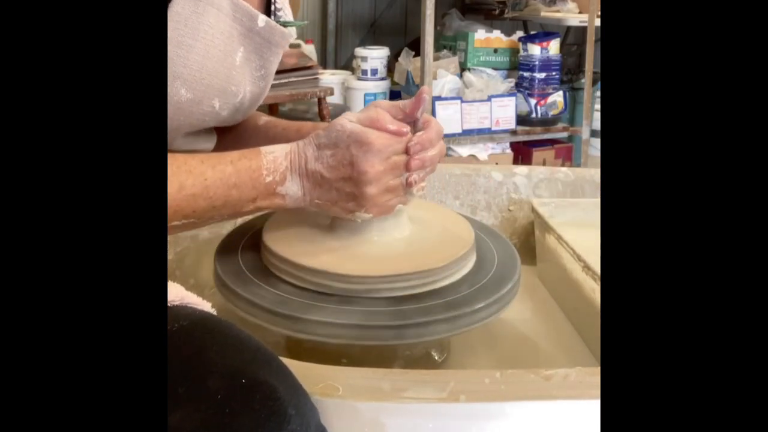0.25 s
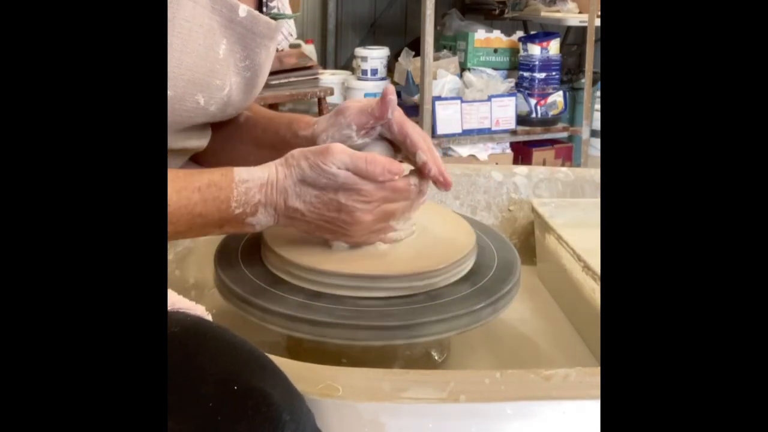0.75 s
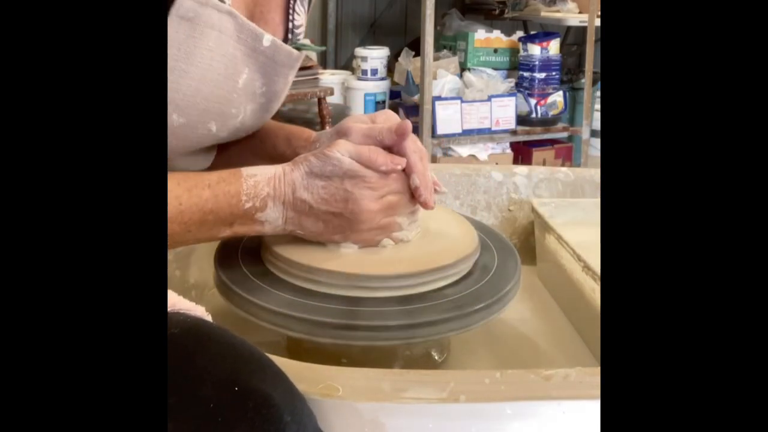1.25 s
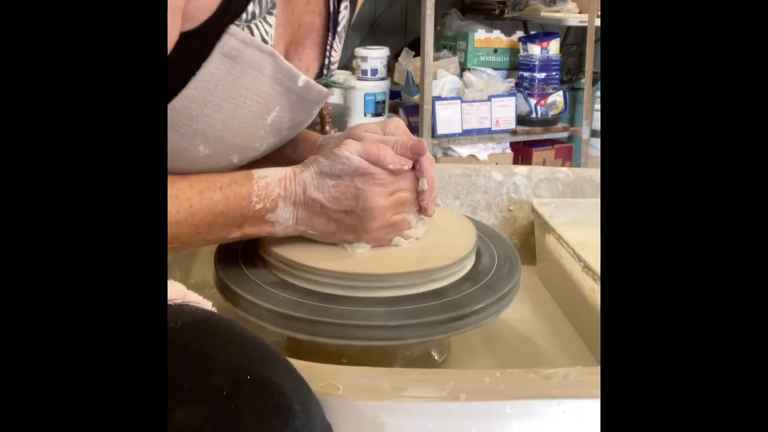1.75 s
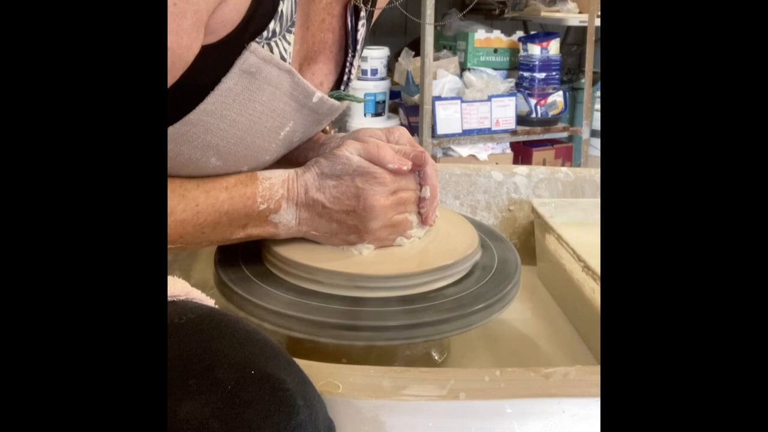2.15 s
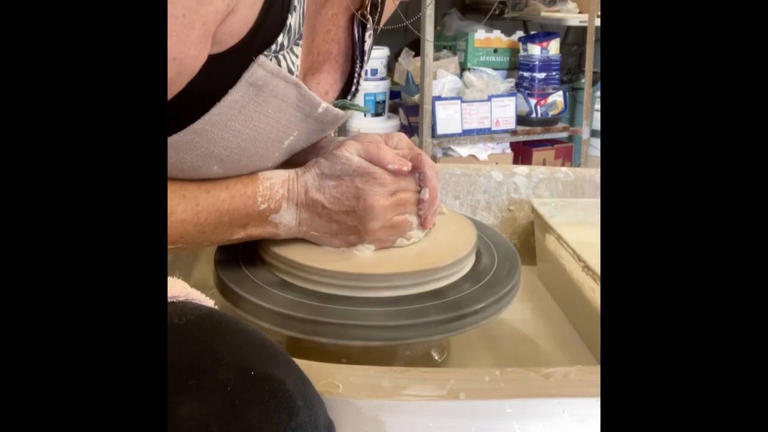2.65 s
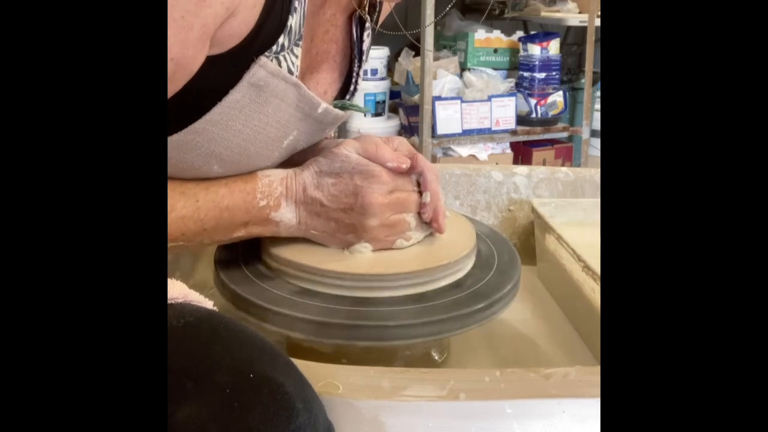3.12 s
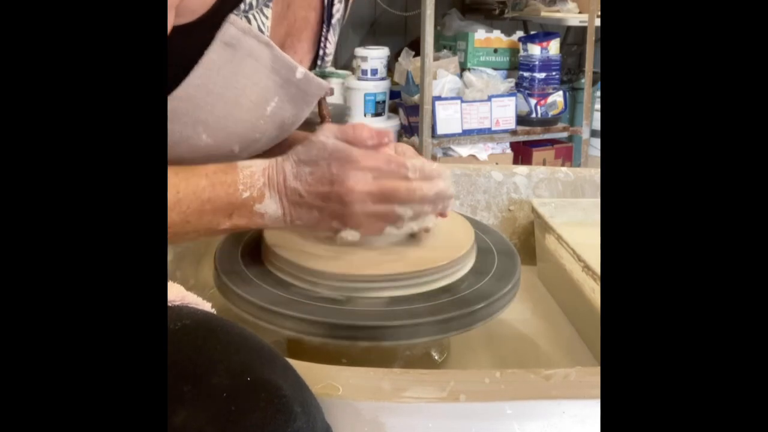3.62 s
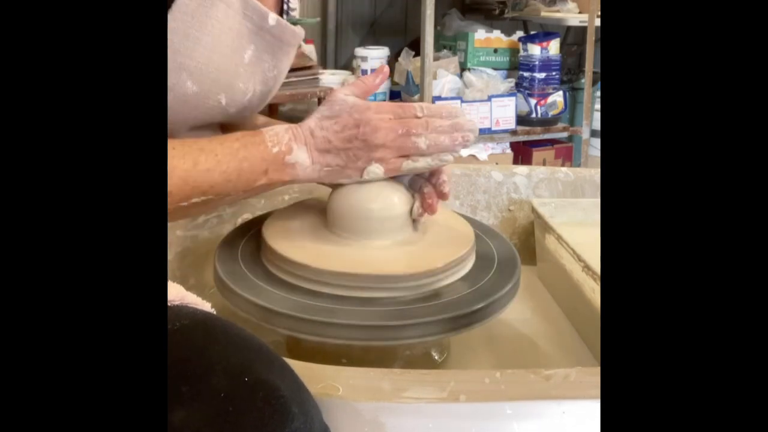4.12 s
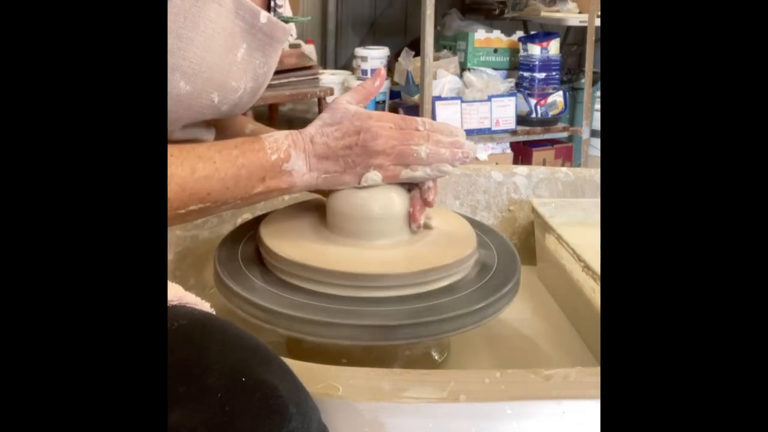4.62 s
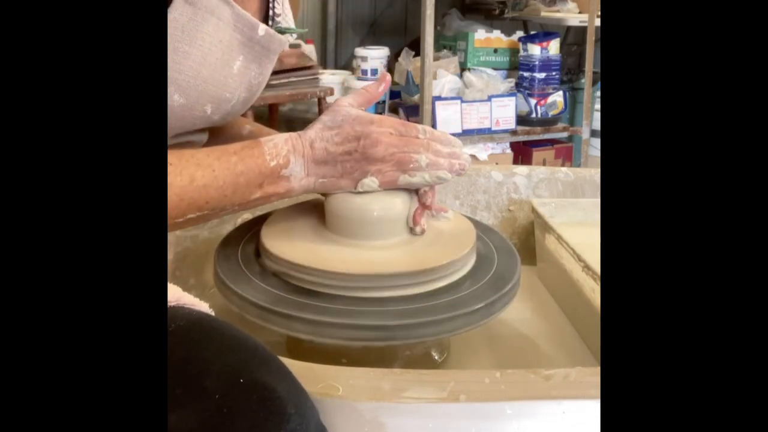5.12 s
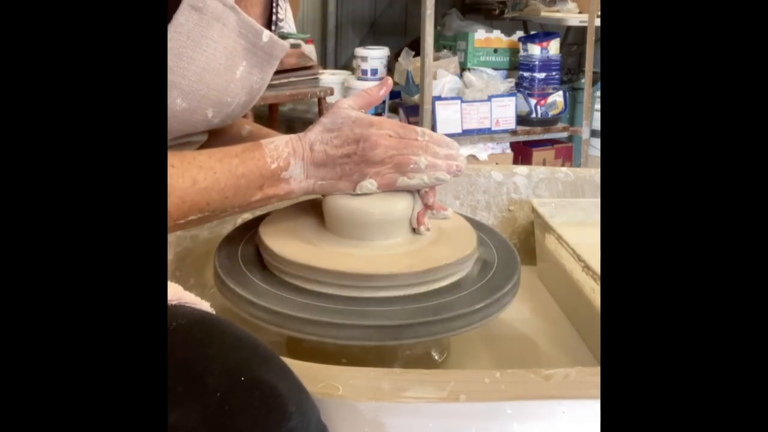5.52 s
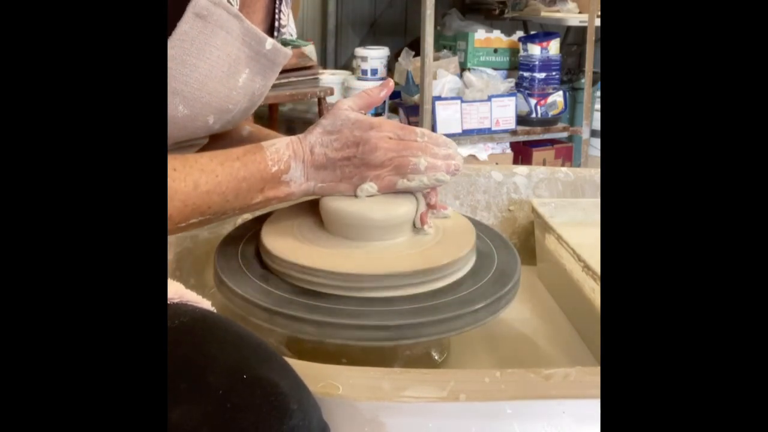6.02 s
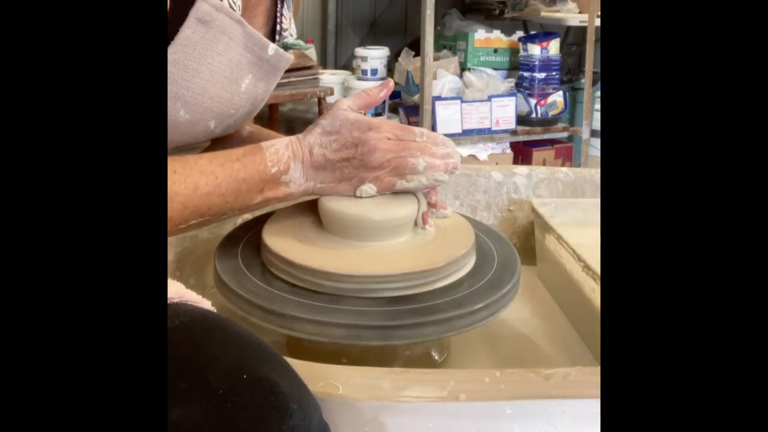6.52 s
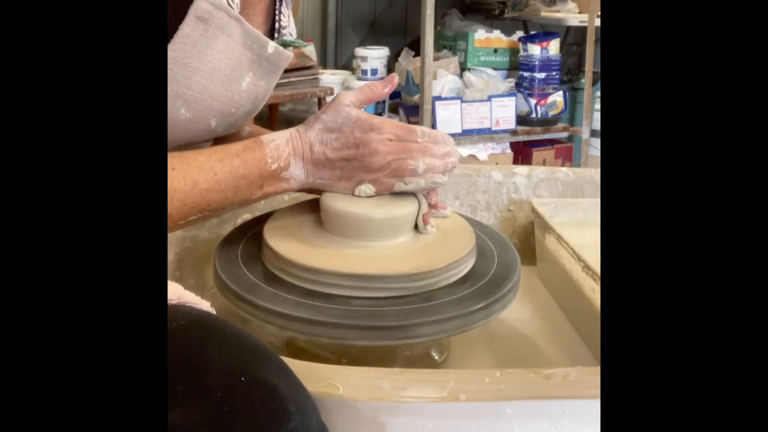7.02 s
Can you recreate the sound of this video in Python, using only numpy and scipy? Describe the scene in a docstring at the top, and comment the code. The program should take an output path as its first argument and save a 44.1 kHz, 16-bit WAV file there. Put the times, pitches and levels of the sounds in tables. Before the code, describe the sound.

Close in a small pottery studio, an electric wheel hums constantly, deep and slightly throbbing, with belt rumble and a thin whine. Wet hands touch the clay quietly, then a hard knock rattles the splash pan at about two seconds. Gritty palm hiss grows as the hands press, with brief low groans, then eases into soft rubbing, tiny wet ticks and very faint high squeaks. The hum runs on to the end.

```python
"""A motor hums at twice the mains rate and throbs with each turn of an electric pottery wheel.
Belt and shaft add a rumble and a faint whine as lines tied to one drive speed, over filtered rolling noise.
Two wet hands centre a lump of clay: palms and fingers hiss as shaped noise, slip ticks in decaying puffs,
wet skin squeaks in gliding sines, and one knock with a short rattle rings the modes of the splash pan."""
import sys
import numpy as np
from scipy import signal
from scipy.fft import rfft, irfft
from scipy.io import wavfile
from scipy.ndimage import uniform_filter1d

SR = 44100
rng = np.random.default_rng(int(sys.argv[2]) if len(sys.argv) > 2 else 0)


def inscribe(sig):
    """Save sig as 16-bit PCM at rate SR to the path in sys.argv[1].

    A 1-D sig is mono; a 2-D sig holds one channel per row.
    Samples are clipped to [-1, 1] before scaling.
    """
    pcm = np.round(np.clip(np.atleast_2d(sig).T, -1, 1) * 32767)
    wavfile.write(sys.argv[1], SR, pcm.astype(np.int16))


N = 320166
T = np.arange(N) / SR
HZ = np.fft.rfftfreq(N, 1 / SR)
MAINS_HZ = 50.0
OCTAVE_HZ = 4 * MAINS_HZ  # octave of the hum
SWELL_S = 1.742  # lines near the octave come into step here
EDGE_HZ = 15700


def gain_of(db):
    """Decibels to amplitude."""
    return np.exp(np.asarray(db) * (np.log(10) / 20))


def evened(x):
    """Scales to rms 1."""
    return x / np.sqrt(np.mean(abs(x) ** 2) + 1e-30)


def read(points, hz):
    """Joins spectrum points by straight lines over log frequency."""
    f, value = np.transpose(points)
    return np.interp(np.log(hz + 1), np.log(f + 1), value)


def curve(points):
    """A control curve at every sample."""
    return np.interp(T, *np.transpose(points))


def add(mix, s, sound):
    """Mixes a stereo sound in at time s."""
    part = mix[:, max(round(s * SR), 0):][:, :sound.shape[1]]
    part += sound[:, :part.shape[1]]


def drift(rate_hz, size=2048):
    """Slow chance of rms 1; its spectrum falls as a Gaussian of this width."""
    f = np.fft.rfftfreq(size, T[-1] / size)
    slow = irfft(rfft(rng.standard_normal(size)) * np.exp(-.5 * (f / rate_hz) ** 2) * (f > 0))
    return np.interp(T, np.linspace(0, T[-1], size), evened(slow))


def beat(turns, times, place):
    """A swing of +-1 that peaks so many times a turn, with one of its peaks at the given place in the turn."""
    return np.cos(2 * np.pi * times * (turns - place))


# Likeness of the two ports. Each row: frequency in Hz, correlation (clipped to +-1).
PORT_LIKENESS = [(60, 1.5), (290, 1.5), (480, 0.63), (700, 0.02), (1100, -0.27), (1400, 0), (2200, -0.31),
                 (3500, -0.24), (5000, -0.02), (6000, .5), (6600, 1.5), (15000, 1.02)]
# Balance of the two ports, for noise and tones. Each row: frequency in Hz, left minus right in dB.
PORT_BALANCE_DB = [(60, -4.5), (110, -5), (200, -6), (380, -2), (700, -3), (1290, -0.5), (2380, 0),
                   (15000, 0)]


def noise(colour_db, count=N):
    """Stereo noise, partly correlated at the two ports; colour_db gives dB per Hz against frequency."""
    hz = np.fft.rfftfreq(count, 1 / SR)
    a, b = rfft(rng.standard_normal((2, count)))
    same = np.clip(read(PORT_LIKENESS, hz), -1, 1)
    lean = gain_of(read(PORT_BALANCE_DB, hz) / 2)
    pair = np.array([a * lean, (same * a + np.sqrt(1 - same ** 2) * b) / lean])
    return irfft(pair * gain_of(colour_db(hz)), count) * np.sqrt(SR / 2)


def puff(hz, octaves, count):
    """Noise of rms 1 in one soft band."""
    def band_db(f):
        return -10 / np.log(10) * (np.log2((f + 1) / hz) / octaves) ** 2
    return evened(noise(band_db, count))


def tone(turns, hz, db, lead_rad, in_step=False):
    """One line at both ports; its starting phase is random unless it is in step with others."""
    start = rng.random() * (not in_step)
    lean = gain_of(read(PORT_BALANCE_DB, hz) / 2)
    angle = (2 * np.pi * ((turns + start) % 1)).astype(np.float32)
    return np.sqrt(2) * gain_of(db) * np.array([lean * np.cos(angle + lead_rad), np.cos(angle) / lean])


def shelves(x, share, spread_s=.02, count=24):
    """Early reflections from walls and shelves cut fine peaks and notches into a sound above the bass."""
    delay_s = .002 + spread_s * rng.random(count)
    sign = rng.choice([-1., 1.], count)
    taps = np.zeros(N)
    taps[(delay_s * SR).astype(int)] = sign / np.sqrt(count)
    wet = share * HZ / (HZ + 700)
    return irfft(rfft(x) * (1 + wet * rfft(taps)) / np.sqrt(1 + wet ** 2), N)


def flicker(x, patchy_db, size=1024):
    """Above the bass, the level flickers in patches a few hundred Hz wide and tens of ms long."""
    hz, _, z = signal.stft(x, SR, nperseg=size)
    patches = uniform_filter1d(rng.standard_normal(z.shape[1:]), size=6, axis=0)
    patches = evened(uniform_filter1d(patches, size=4, axis=1))
    depth_db = patchy_db * hz / (hz + 800)
    return signal.istft(z * gain_of(depth_db[:, None] * patches), nperseg=size)[1][:, :N]


# Palms: light wetting, a hard push to centre the clay, then smoothing its top.
# Each row: time in seconds, hiss in dB before the lump and softening act on it.
PALM_PRESSURE = [(0, -91), (.35, -65), (.6, -84), (1.2, -83), (1.5, -97), (1.98, -73), (2.15, -64.5),
                 (2.28, -61.5), (2.4, -63), (2.7, -58.5), (3.15, -58.5), (3.42, -62), (3.62, -70),
                 (4.2, -72), (4.6, -72.5), (5.15, -80), (5.55, -75), (5.88, -66), (6.45, -76), (7.1, -72)]
FIRM_DB = -66.5


def firmness():
    """How hard the hands bear down, from 0 to 2/3, a soft step in the palms' level."""
    return 1 / (1.5 + np.exp((FIRM_DB - curve(PALM_PRESSURE)) / 2))


# The potter leans over the wheel and shades the whine, then sits back.
# Each row: time in seconds, whine in dB.
LEAN_DB = [(0, 0.5), (1.5, -2.2), (3.1, -2.6), (4, 2.2), (5.5, 1.5), (6.2, 3.5), (7.3, 2)]
# The belt tugs at the shaft. Each row: times a lap, swing in dB, place of one peak in the lap 0-1.
BELT_TUG = [(1, 1.7, 0.53), (2, 2.0, 0.43)]


def whine_level(laps):
    """The main whine (dB) follows the potter's lean and throbs as the belt tugs at the shaft."""
    return curve(LEAN_DB) + sum(db * beat(laps, times, place) for times, db, place in BELT_TUG)


def shade(hz, centre_hz=1330, octaves=0.19):
    """How far a frequency belongs to the main whine, which the potter can shade, 0-1."""
    return np.exp(-(np.log2((hz + 1) / centre_hz) / octaves) ** 2)


def shaded(x, whine_db, share=0.84):
    """The whine's band within a broad sound follows a share of the whine's level."""
    return x + irfft(rfft(x) * shade(HZ), N) * (gain_of(share * whine_db) - 1)


# Rolling noise of the drive, before resonances and treble cut. Each row: frequency in Hz, dB per Hz.
WHIRR_SPECTRUM = [(20, -94.5), (33, -85), (45, -69.5), (60, -68.5), (75, -74), (105, -67), (200, -67),
                  (280, -71), (355, -79), (410, -70), (470, -71), (530, -78), (600, -79.5), (950, -88.5),
                  (1400, -90.5), (2400, -95), (2900, -101), (3300, -108)]
# Air of the room, before resonances. Each row: frequency in Hz, dB per Hz.
AIR_SPECTRUM = [(1000, -110), (3200, -101), (4200, -103), (4800, -99), (5500, -103), (7500, -106.5),
                (9500, -106), (11000, -112), (13000, -119), (15500, -125)]
# Housing resonances. Each row: centre in Hz, width in Hz, lift in dB.
HOUSING_MODES = [(688, 16, 4), (789.5, 49, 9.5), (875, 20, 5), (1020, 14, 5), (1120, 52, 7.5),
                 (1348, 22, 4), (1392, 55, 6), (1540, 22, 4), (1650, 22, 3), (1690, 36, 6), (1868, 24, 5),
                 (2015, 24, 5.5), (2190, 25, 5), (2347, 16, 7), (2540, 32, 8), (2655, 30, 9), (2755, 35, 9),
                 (2915, 45, 9), (3620, 46, 1), (3870, 75, 4), (4940, 53, 2), (6400, 120, 2.5),
                 (8350, 190, 8.5)]


def rolling(laps, shaft, half_lap_db=1.0, shaft_db=1.5, swell_db=1.0):
    """Rolling noise rings in the housing and pulses with belt and shaft, over air without that pulse."""
    def housing(f):
        return sum(db / (1 + (2 * (f - hz) / width) ** 2) for hz, width, db in HOUSING_MODES)

    def whirr_db(f):
        return read(WHIRR_SPECTRUM, f) + housing(f) - 20 * np.log10(1 + (f / 5000) ** 4)

    pulse_db = half_lap_db * np.cos(4 * np.pi * laps) + shaft_db * np.sin(2 * np.pi * shaft)
    whirr = noise(whirr_db) * gain_of(pulse_db + swell_db * drift(11.0))
    air = noise(lambda f: read(AIR_SPECTRUM, f) + housing(f))
    return flicker(shelves(whirr + air, share=0.38), patchy_db=2.9, size=1536)


# Motor shaft. Each row: multiple of its turning rate (rounded for pitch), dB before shading,
# left lead in radians.
SHAFT_LINES = [(5, -61, 8), (6, -47, 4.5), (7.04, -46.5, 0), (10, -52, 1.5), (13, -65, -2.5),
               (14, -62.5, 0), (16, -58.5, -0.9), (17, -56, 1), (20, -59, 0.9), (28, -71, 0.5),
               (30, -64.5, 1), (32, -64, -1.5), (40, -75.5, -1), (45, -66.5, -2), (46, -67.5, -2),
               (47.8, -66.5, 2.5), (51, -71.5, 1.5), (52, -55, 3.5), (53, -72.5, 2.5), (56.5, -73, -0.5)]
# Drone and whine of the bearings. Each row: Hz at mean speed, dB before level curves, left lead in radians.
BEARING_LINES = [(375, -55, 0), (1378, -75, 1), (1397, -70, 1), (1416, -71, 1), (1423, -74, 2),
                 (1446, -72.5, 1), (1626, -74, -1.5), (1667, -76, -1), (1677, -70, -.8), (1690, -76, -1),
                 (1708, -71, -1), (1727, -74, -1), (1779, -78, 2), (1821, -79, 1), (1860, -80, 1),
                 (1923, -74, 2), (1955, -71, 2.8), (2077, -76, 1.2), (2347, -84, 0), (2530, -81, 0),
                 (4790, -87, .5), (4968, -82, .5)]
# Bearings' upper whine. Each row: time in seconds, level change in dB.
UPPER_WHINE_DB = [(0, 2), (1.7, 1.5), (3.5, 0), (4.5, -0.5), (7.3, -1)]
UPPER_LO_HZ, UPPER_HI_HZ, WAVER_DB = 1600, 1900, 1.5
SHAFT_SLIP_TURNS, FLUTTER_HZ = 0.0014, 8.0


def motor(shaft, shaft_hz, whine_db, flutter=0.2, wander_cycles=0.072):
    """Multiples of the shaft's turning rate and the thin tones of its bearings."""
    out = np.zeros((2, N))
    upper_db = curve(UPPER_WHINE_DB) + WAVER_DB * drift(8.2)
    for order, db, lead_rad in SHAFT_LINES:
        turns = round(order) * (shaft + SHAFT_SLIP_TURNS * drift(3.9))
        hz = order * shaft_hz
        line = tone(turns, hz, db + shade(hz) * whine_db, lead_rad)
        out += line * (1 + flutter * drift(FLUTTER_HZ))
    for hz, db, lead_rad in BEARING_LINES:
        turns = hz * shaft / shaft_hz + wander_cycles * drift(3.4)
        swell_db = upper_db if UPPER_LO_HZ < hz < UPPER_HI_HZ else shade(hz) * whine_db
        out += tone(turns, hz, db + swell_db, lead_rad) * (1 + flutter * drift(FLUTTER_HZ))
    return out


# The belt shakes the frame. Each row: multiple of its lap rate, dB running free.
BELT_LINES = [(12, -48.5), (13, -48.5), (14, -51), (15, -60), (16, -55), (17, -47.5), (18, -50), (19, -44),
              (20, -49.5), (21, -55.5), (22, -50), (23, -52.5), (24, -47.5), (25, -46), (26, -48),
              (27, -46.5), (28, -43.5), (29, -52), (30, -55.5), (31, -57.5), (32, -53), (34, -54.5),
              (35, -52), (37, -63.5), (39, -57.5), (41, -59.5), (44, -55), (45, -61.5), (46, -57.5),
              (57, -53), (58, -55), (59, -54.5), (60, -60.5)]
BELT_SLIP_LAPS, BEAT_RANGE_HZ = 0.002, 16
PULSE_PLACE_LAPS, PULSE_SCATTER_CYCLES = 0.475, 0.12
TAUT_DB_PER_FIRMNESS, TAUT_ABOVE_ORDER = -5, 50


def belt(laps, lap_hz, flutter=0.13):
    """The uneven belt shakes each lap and pulses as its stiff spot meets each pulley.

    Slip blurs high multiples, load calms the highest, and those near the octave beat with it."""
    out = np.zeros((2, N))
    since_swell = laps - np.interp(SWELL_S, T, laps)
    taut = gain_of(TAUT_DB_PER_FIRMNESS * firmness())
    for order, db in BELT_LINES:
        hz, k = order * lap_hz, round(order)
        beats = abs(hz - OCTAVE_HZ) < BEAT_RANGE_HZ
        pulses = hz < OCTAVE_HZ - BEAT_RANGE_HZ
        turns = k * since_swell
        if pulses:  # a quarter cycle on odd multiples gives a second pulse half a lap later
            scatter = PULSE_SCATTER_CYCLES * rng.standard_normal()
            turns = k * (laps - PULSE_PLACE_LAPS) + k % 2 / 4 + scatter
        turns = turns + k * BELT_SLIP_LAPS * drift(1.73)
        line = tone(turns, hz, db, 0.15, in_step=beats or pulses) * (1 + flutter * drift(3.2))
        out += line * taut if order > TAUT_ABOVE_ORDER else line
    return out


# Groans under load. Each row: middle in seconds, peak level in dB.
GROAN_TIMES = [(2.39, -43), (2.81, -45), (3.22, -39.5)]
GROAN_HZ, GROAN_S = 229, 0.092


def groans():
    """The drive groans briefly under the full weight of the hands: one line in Gaussian swells."""
    swell = sum(gain_of(db) * np.exp(-(2 * (T - s) / GROAN_S) ** 2) for s, db in GROAN_TIMES)
    return tone(GROAN_HZ * T, GROAN_HZ, 0, 0) * swell


LAG_PLACE_TURNS = 0.09  # where the octave swells and the overtones lag
OCTAVE_DB, ROTOR_DB, ROTOR_LAG_HZ = -41, -42.5, 0.92


def octave(wheel, lead_rad=0.12, wander_cycles=0.058, throb_db=2.0):
    """The hum's octave and the slightly slower rotor beat together, and swell once a wheel turn."""
    lines = (OCTAVE_HZ, OCTAVE_DB), (OCTAVE_HZ - ROTOR_LAG_HZ, ROTOR_DB)
    out = np.zeros((2, N))
    for hz, db in lines:
        turns = hz * (T - SWELL_S) + wander_cycles * drift(1.4)
        out += tone(turns, hz, db, lead_rad, in_step=True)
    return out * evened(gain_of(throb_db * beat(wheel, 1, LAG_PLACE_TURNS)))


# Hum overtones. Each row: multiple of the mains, dB running free, depth of the throb,
# share of it that comes twice a turn, left lead in radians.
HUM_OVERTONES = [(6, -42.5, .12, .25, 0.37), (8, -59.5, 0.33, .4, 2), (10, -53.5, 0.44, .75, 0.86),
                 (16, -61, 0.44, 0.96, -.5), (26, -64.5, .15, .5, 2), (28, -74, .15, .5, 2.5),
                 (40, -77.5, 0.19, .5, 0)]
HUM_DB, LOAD_DB_PER_FIRMNESS = -25.5, 1.5
THROB_ONCE_PLACE_TURNS, THROB_TWICE_PLACE_TURNS = 0.76, 0.45
LAG_FREE_CYCLES, LAG_CYCLES_PER_FIRMNESS = 0.21, 0.12


def hum(wheel, sway_cycles=0.0077, lead_rad=0.26, unsteady=0.47,
        once_db_per_firmness=1.2, twice_db=0.55, overtone_db_per_firmness=2.1):
    """The motor's iron hums, louder under load; off-centre clay makes its overtones throb and lag."""
    angle, firm = 2 * np.pi * wheel, firmness()
    load_db = HUM_DB + firm * (LOAD_DB_PER_FIRMNESS - once_db_per_firmness * np.sin(angle))
    load_db = load_db + twice_db * np.cos(2 * angle - 1)
    out = tone(2 * MAINS_HZ * T + sway_cycles * np.sin(angle), 2 * MAINS_HZ, load_db, lead_rad)
    lag = LAG_FREE_CYCLES + LAG_CYCLES_PER_FIRMNESS * firm
    lag = lag * np.cos(np.pi * (wheel - LAG_PLACE_TURNS)) ** 6  # once a turn
    once = beat(wheel, 1, THROB_ONCE_PLACE_TURNS)
    twice = beat(wheel, 2, THROB_TWICE_PLACE_TURNS)
    for order, db, depth, double, port_lead_rad in HUM_OVERTONES:
        throb = (1 - double) * once + double * twice
        turns = round(order) * MAINS_HZ * T - lag + 0.1 * depth * drift(3.3)
        loaded_db = db + double * overtone_db_per_firmness * firm
        swell = evened(1 + depth * (throb + unsteady * drift(8.2)))
        out += tone(turns, order * MAINS_HZ, loaded_db, port_lead_rad) * swell
    return out


# A knock, then its rattle. Each row: start in seconds, starting dB, t60 in seconds, treble corner in Hz.
KNOCK_CONTACTS = [(2.0351, -31.5, 0.055, 14000), (2.0455, -33.5, 0.06, 3000), (2.0525, -34.5, 0.09, 3200),
                  (2.0625, -43, 0.12, 2200)]
# Colour of the contact. Each row: frequency in Hz, relative dB per Hz.
CRACK_COLOUR = [(150, 0), (270, 9), (450, 10.5), (750, 7), (950, -1.5), (1100, 2.5), (1400, 2), (1650, -6),
                (2000, -10), (2900, -7), (3900, -3), (5200, -12), (7200, -12.5), (9800, -9.5), (12000, -21),
                (16000, -25)]
# Splash pan modes. Each row: frequency in Hz, starting dB, t60 in seconds.
PAN_MODES = [(280, -36.5, 0.35), (378, -41, 0.25), (465, -35.5, 0.3), (479, -39, 0.35), (605, -35.5, 0.12),
             (660, -38, 0.1), (743, -40, 0.14), (800, -39.5, 0.16), (1115, -47, 0.15), (1300, -49, 0.09),
             (1410, -47, 0.12), (2778, -54, 0.14), (3967, -48, 0.12), (8750, -52, 0.11), (12250, -55, 0.11)]
RATTLE_DB = 1.5


def knock(room_db=-50, room_t60_s=0.72, count=22050):
    """A hard contact and duller, ragged rebounds ring the splash pan; the studio answers briefly."""
    out, t = np.zeros((2, N)), np.arange(count) / SR

    def crack(top_hz):
        return evened(noise(lambda f: read(CRACK_COLOUR, f) - 10 * np.log10(1 + (f / top_hz) ** 2), count))

    for s, db, t60_s, top_hz in KNOCK_CONTACTS:
        grit = evened(gain_of(RATTLE_DB * drift(250, size=16384)[:count]))
        add(out, s, gain_of(db - 60 * t / t60_s) * grit * crack(top_hz))
    ring = sum(tone(hz * t, hz, db - 60 * t / t60_s, 0) for hz, db, t60_s in PAN_MODES)
    room = gain_of(room_db - 60 * t / room_t60_s) * crack(EDGE_HZ)
    add(out, KNOCK_CONTACTS[0][0], (ring + room) * (1 - np.exp(-t / 0.0015)))  # soft onset
    return out


# Squeaks of wet skin, one list of rows each.
# Each row: time in seconds, pitch in Hz, dB before the trim SQUEAK_DB.
SQUEAK_GLIDES = [
    [(.76, 9200, -90), (.85, 9950, -69), (.92, 10600, -69), (.98, 11200, -62), (1.03, 12300, -76),
     (1.08, 13100, -76), (1.16, 12900, -87), (1.21, 12450, -67), (1.27, 11100, -66), (1.3, 10200, -88)],
    [(4.72, 9100, -85), (4.78, 9600, -73), (4.84, 11100, -76), (4.9, 12000, -74), (4.97, 12000, -73),
     (5.06, 11300, -75), (5.1, 10500, -90)],
    [(4.9, 7600, -85), (4.93, 8100, -66), (4.96, 8350, -68), (5, 8150, -85)],
    [(4.99, 9400, -85), (5.05, 8950, -64), (5.13, 8650, -71), (5.2, 9000, -65), (5.28, 8700, -75),
     (5.35, 7550, -73), (5.39, 7050, -74), (5.44, 6570, -88)],
]
CATCH_DB, SQUEAK_DB = 2.8, -3.0


def squeaks(waver=0.01):
    """Very high whistles swell, glide along smoothed curves and catch as the film of water thins."""
    out = np.zeros(N)
    for glide in SQUEAK_GLIDES:
        s, hz, db = np.transpose(glide)
        pitch_hz = uniform_filter1d(np.interp(T, s, hz), size=1500)
        pitch_hz = pitch_hz * (1 + waver * drift(400, size=8192))
        level = gain_of(np.interp(T, s, db)) * (T > s[0]) * (T < s[-1])
        out += level * np.sqrt(2) * np.sin(2 * np.pi * np.cumsum(pitch_hz) / SR)
    return out * gain_of(SQUEAK_DB) * evened(gain_of(CATCH_DB * drift(25)))


# Bubbles of slip. Each row: start in seconds, starting dB, centre in Hz, width in octaves, t60 in seconds.
SLIP_BUBBLES = [(.325, -54, 11700, .17, .035), (.83, -64, 11500, .25, .04), (1.09, -63, 11200, .12, .03),
                (2.364, -59, 9000, .6, .025), (3.221, -62, 8000, .6, .025), (3.571, -63, 12000, .2, .02),
                (3.774, -61, 10000, .25, .025), (3.985, -56, 9000, .4, .04), (4.14, -53, 6200, 0.4, .028),
                (4.435, -52, 5200, 0.26, 0.03), (4.5045, -44.5, 10800, 0.28, 0.009),
                (4.577, -57, 4000, .5, .02), (4.639, -51.5, 3700, 0.46, 0.018),
                (4.676, -57, 6000, .6, .025), (4.688, -60, 9000, .5, 0.036), (5.032, -56, 8000, .5, .025)]


def slip_ticks(count=4096):
    """Tiny bubbles burst between skin and clay: decaying puffs of banded noise."""
    out, t = np.zeros((2, N)), np.arange(count) / SR
    for s, db, hz, octaves, t60_s in SLIP_BUBBLES:
        add(out, s, gain_of(db - 60 * t / t60_s) * puff(hz, octaves, count))
    return out


# Off-centre lump.
# Each row: times a turn, swing in dB before scaling by pressure, place of one peak in the turn 0-1.
LUMP_SWELL = [(1, 4, 0.87), (2, 3.5, 0.53)]
# Colour of the palms' hiss. Each row: frequency in Hz, relative dB per Hz.
SMEAR_COLOUR = [(500, -26.5), (1500, 3.5), (3000, 2.5), (5000, -2.5), (8000, -8.5), (11000, -2),
                (14000, -2), (16000, -1)]
# Fingers drag, narrow where they nearly squeak.
# Each row: middle in seconds, length in seconds, dB before flicker and grain, centre in Hz, width in octaves.
FINGER_RUBS = [(2.677, .04, -58, 4020, .028), (2.708, .03, -61, 3430, .035), (2.715, 0.19, -63.5, 3650, .2),
               (2.752, .025, -63, 3450, .03), (2.776, .02, -63, 3620, .03), (2.778, .04, -62, 4050, .04),
               (3.365, .05, -61, 2700, 0.3), (3.498, 0.07, -61.5, 2900, 0.45),
               (3.982, 0.045, -59.5, 2980, 0.43), (4.193, 0.095, -63.5, 5600, 0.36),
               (4.215, 0.12, -66, 9000, 0.3), (4.449, .025, -62, 5000, .12), (4.6, 0.18, -67, 5500, 0.95),
               (4.616, 0.15, -58.7, 3280, 0.48), (4.634, .05, -59, 2900, .22),
               (6.504, 0.073, -61, 2700, .5), (6.668, 0.043, -64, 6000, 0.76), (6.93, 0.046, -61, 2700, .6)]
RUB_GRAIN_DB, STICK_DB = 2.4, 0.7


def hands(wheel, bright_per_firmness=0.61, light_touch=0.33, soft_hz=11000, soft_db=-1):
    """Grit slides under palms and fingers; pressure brightens the hiss, which swells with the lump."""
    lump_db = sum(db * beat(wheel, round(times), place) for times, db, place in LUMP_SWELL)
    pressure_db = curve(PALM_PRESSURE) + lump_db * np.maximum(firmness(), light_touch)
    firm = bright_per_firmness * firmness()
    bright = evened(noise(lambda f: read(SMEAR_COLOUR, f)))
    soft = evened(noise(lambda f: read(SMEAR_COLOUR, f) - 10 * np.log10(1 + (f / soft_hz) ** 8)))
    out = np.sqrt(firm) * bright + gain_of(soft_db) * np.sqrt(1 - firm) * soft
    out = out * gain_of(pressure_db)
    for s, length_s, db, hz, octaves in FINGER_RUBS:
        count = round(2 * length_s * SR)
        grit = evened(gain_of(RUB_GRAIN_DB * drift(150, size=8192)[:count]))
        swell = 1 / (1 + np.linspace(-2, 2, count) ** 6)
        add(out, s - length_s, gain_of(db) * puff(hz, octaves, count) * grit * swell)
    stick_slide = evened(gain_of(STICK_DB * drift(25)))
    return flicker(out, patchy_db=2.5) * stick_slide


# Speed of the drive. Each row: time in seconds, belt laps per second.
DRIVE_SPEED = [(0, 7.345), (1, 7.31), (2, 7.304), (2.7, 7.314), (3.5, 7.335), (4.5, 7.344), (5.5, 7.326),
               (7.3, 7.335)]
SHAFT_PER_BELT, WHEEL_PER_BELT = 3.3955, 0.3025  # turns per belt lap


def scene():
    """The belt ties the motor shaft to the wheel, so one speed drives belt, shaft and wheel."""
    laps_per_s = curve(DRIVE_SPEED)
    laps, lap_hz = np.cumsum(laps_per_s) / SR, laps_per_s.mean()
    shaft, wheel = SHAFT_PER_BELT * laps, WHEEL_PER_BELT * laps
    whine_db = whine_level(laps)
    machine = shaded(rolling(laps, shaft), whine_db) + motor(shaft, SHAFT_PER_BELT * lap_hz, whine_db)
    machine = machine + belt(laps, lap_hz) + groans() + octave(wheel) + hum(wheel)
    return machine + knock() + squeaks() + slip_ticks() + hands(wheel)


def record(dry):
    """Limits the band with a linear-phase low-pass at EDGE_HZ."""
    low_pass = signal.firwin(511, EDGE_HZ, window=("kaiser", 9), fs=SR)
    return signal.oaconvolve(dry, low_pass[None], "same")


dry = scene()
out = record(dry)
inscribe(out)
```